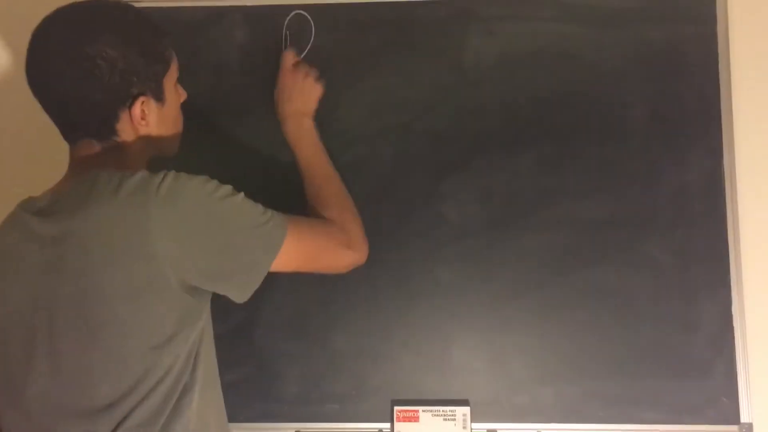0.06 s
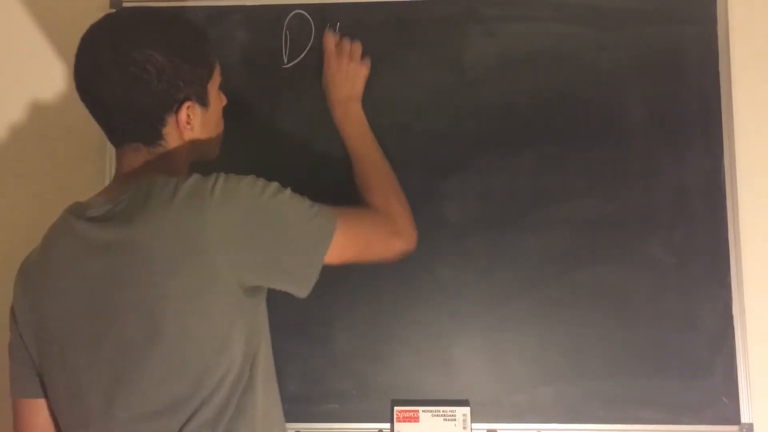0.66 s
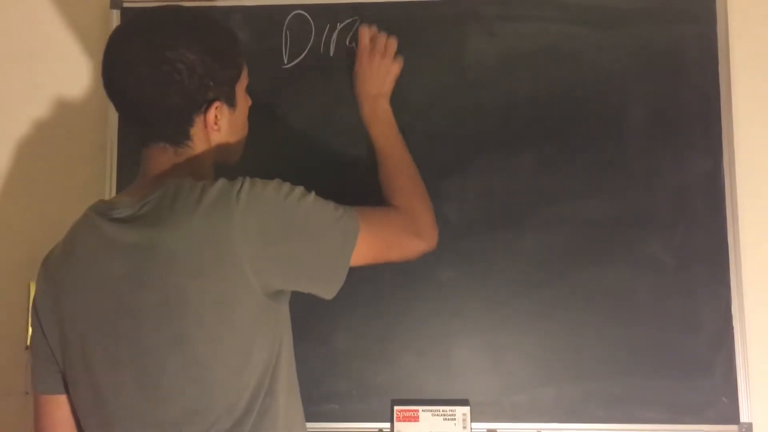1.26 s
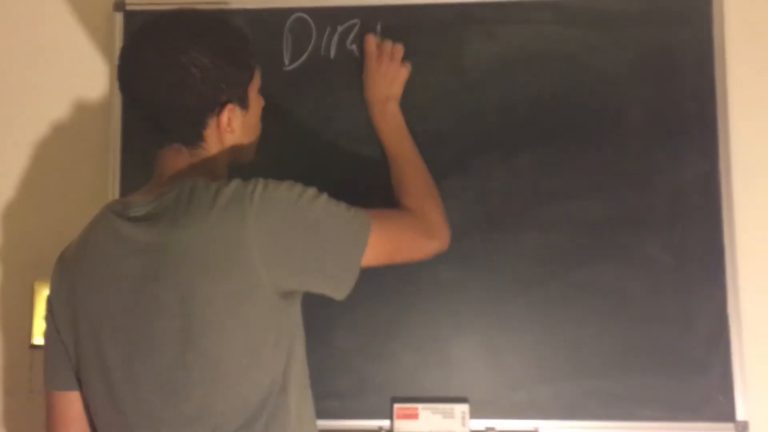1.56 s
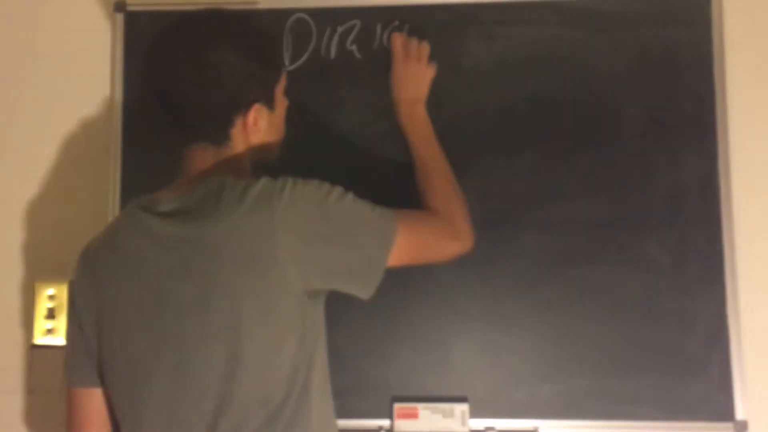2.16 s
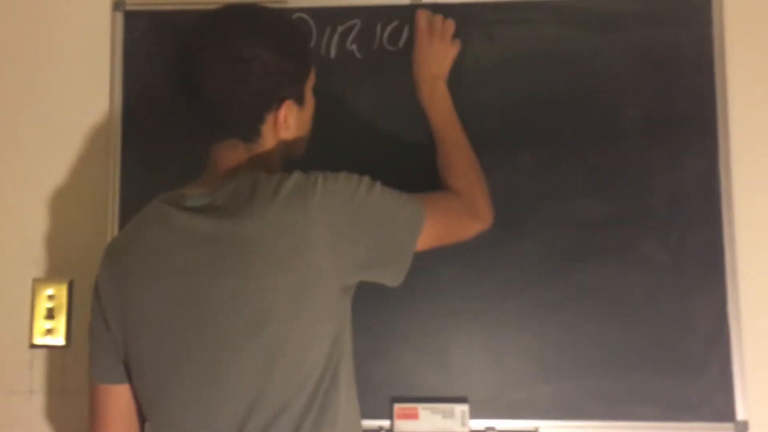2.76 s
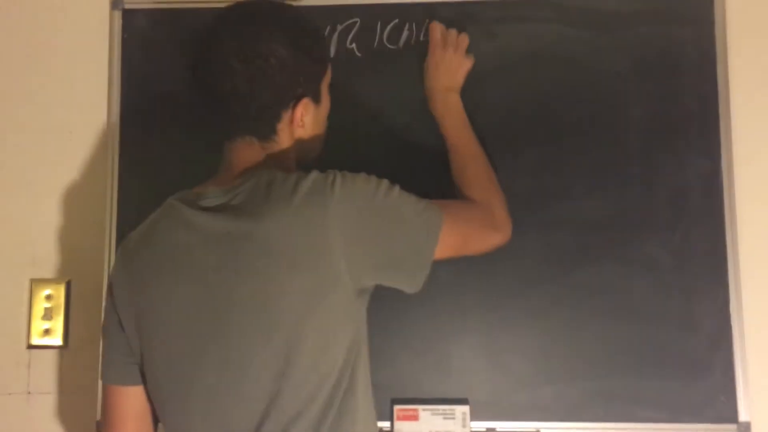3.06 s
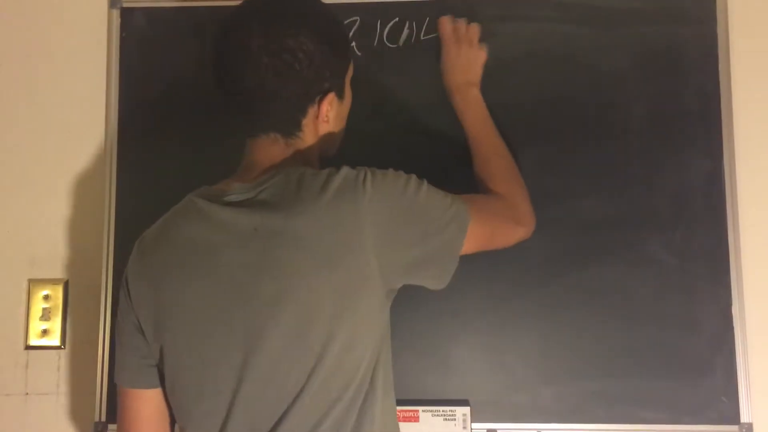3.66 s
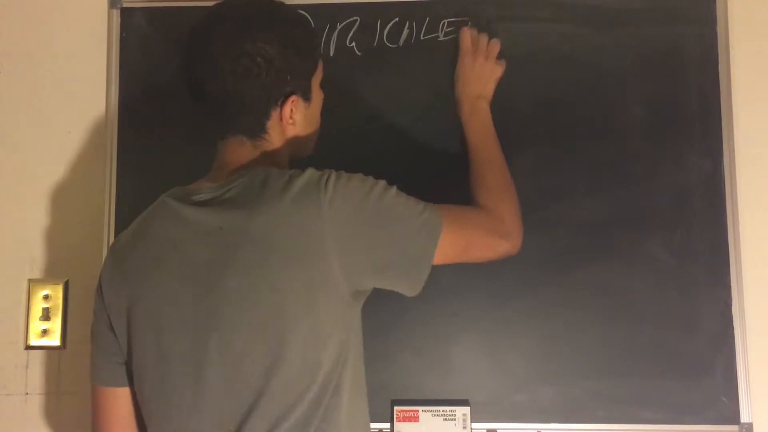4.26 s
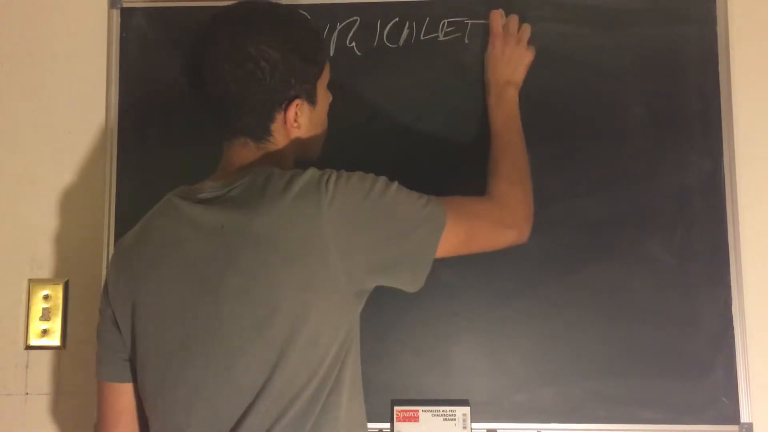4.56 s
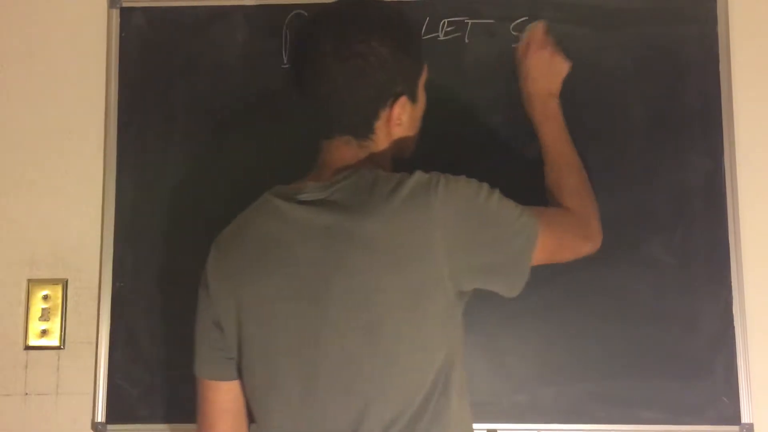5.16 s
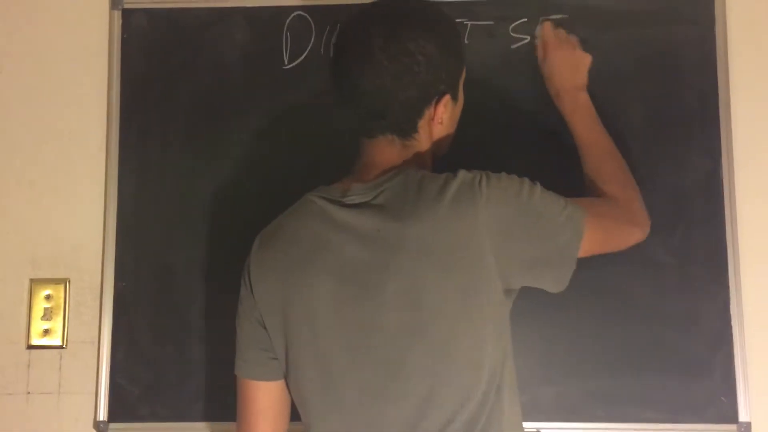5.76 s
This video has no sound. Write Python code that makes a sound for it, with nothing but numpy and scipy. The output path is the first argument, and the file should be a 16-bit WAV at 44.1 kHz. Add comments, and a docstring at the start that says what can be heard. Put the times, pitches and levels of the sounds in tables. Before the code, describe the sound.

Someone prints letters on a blackboard, with light chalk knocks, dry scratchy strokes and a few dull thumps from the loose board.

```python
"""Chalk scrapes softly on a wall-hung blackboard, over faint hum and hiss in a small, bare room.
Someone is printing capitals: the tip drags in tiny slips and sometimes catches in a brief rasp.
Many strokes land with a tap whose bending waves cross the panel, treble first and bass last.
A few taps bump the loose panel against the wall or set its metal frame ringing."""
import sys
import numpy as np
from scipy import signal
from scipy.fft import rfft, irfft, next_fast_len
from scipy.io import wavfile
from scipy.ndimage import map_coordinates

SR = 44100
rng = np.random.default_rng(int(sys.argv[2]) if len(sys.argv) > 2 else 0)


def unload_audio(sound):
    """Save the sound as a 16-bit wav file, at the path given as the first command line argument."""
    columns = np.transpose(np.atleast_2d(sound))
    # keep every value between -1 and 1, then stretch to whole-number steps
    steps = np.round(np.clip(columns, -1, 1) * 32767)
    wavfile.write(sys.argv[1], SR, steps.astype(np.int16))


N = 265041


def amp(db):
    """Decibels to gain."""
    return 10 ** (np.asarray(db) / 20)


def unit_rms(x):
    """Scale to rms 1."""
    return x / np.sqrt(np.mean(x ** 2) + 1e-20)


def curve_at(points, hz):
    """Interpolate (Hz, value) points on a log axis."""
    point_hz, values = np.transpose(points)
    return np.interp(np.log(hz + 1), np.log(point_hz), values)


def add(track, start_s, sound):
    """Mix a sound into the track."""
    start = round(start_s * SR)
    part = sound[max(-start, 0):max(N - start, 0)]
    track[max(start, 0):][:len(part)] += part


def wobble(rate_hz, size):
    """Smooth random curve, rate_hz knots a second."""
    return map_coordinates(rng.standard_normal(4096), [np.arange(size) * rate_hz / SR], mode="mirror")


def second_axes():
    """Time and frequency axes of one second."""
    return np.arange(SR) / SR, np.fft.rfftfreq(SR, 1 / SR)


def waveform(spectrum):
    """Spectrum to one second of sound, faded out at the end."""
    return irfft(spectrum) * np.clip(4 - 5 * second_axes()[0], 0, 1)


def minimum_phase(gain_db):
    """Causal response with this gain."""
    cepstrum = irfft(np.log(amp(gain_db)))
    cepstrum[1:SR // 2] *= 2
    cepstrum[SR // 2 + 1:] = 0
    return np.exp(rfft(cepstrum))


def peaks_db(rows, hz):
    """Summed gain of (Hz, width Hz, dB) resonances."""
    return sum(db / (1 + (2 * (hz - centre) / width) ** 2) for centre, width, db in rows)


def response_db(bands, controls_db, hz):
    """Each band follows each control with its own slope."""
    return curve_at([(centre, db + np.dot(slopes, controls_db)) for centre, db, *slopes in bands], hz)


def noise_band(centre_hz, width_hz):
    """One second of noise through a resonance, rms 1."""
    hz = second_axes()[1]
    return unit_rms(irfft(rfft(rng.standard_normal(SR)) / (1 + (2 * (hz - centre_hz) / width_hz) ** 2)))


def burst(t60_s):
    """Spectrum of a dying noise burst, energy 1."""
    noise = rng.standard_normal(SR) * amp(-60 * second_axes()[0] / t60_s)
    return rfft(noise / np.linalg.norm(noise))


# Room decay. Each row: frequency in Hz, t60 in seconds.
ROOM_DECAY = [(60, 0.88), (160, 0.57), (420, 0.28), (1100, 0.29), (3000, 0.31), (8000, 0.25), (16000, 0.14)]
def room_tail(build_up_s):
    """Spectrum of a diffuse tail; each frequency dies at its own rate."""
    hz, t, noise = signal.stft(rng.standard_normal(SR), SR, nperseg=256)
    decay = amp(-60 * t / curve_at(ROOM_DECAY, hz)[:, None])
    tail = signal.istft(noise * decay, SR, nperseg=256)[1][:SR]
    tail *= 1 - np.exp(-second_axes()[0] / build_up_s)
    return rfft(tail / np.linalg.norm(tail))


def slips(speed, grain_db=4.0, judder_db=3.5):
    """Spectrum of countless tiny, uneven slips of the tip."""
    noise = rng.standard_normal(SR)
    roughness = amp(grain_db * wobble(2500, SR) + judder_db * wobble(88.6, SR))
    return rfft(unit_rms(noise * roughness) * speed)


# Strokes without a tap. Each row: start in seconds, length in seconds, speed in dB, pressure in dB.
STROKES = [(-0.045, 0.28, 2.5, -2.5), (0.848, 0.16, 2.5, -5), (0.998, 0.1, 1.5, -4.5),
           (1.133, 0.041, -2.5, -0.5), (1.212, 0.11, -4, 1), (1.841, 0.12, -1.5, -3),
           (1.962, 0.073, -2.5, 0.5), (2.334, 0.15, -3.5, -3.5), (3.06, 0.1, -3.5, -3),
           (3.471, 0.093, 0.5, -5), (3.578, 0.094, 3, -2.5), (4.391, 0.087, -7.5, -13),
           (4.912, 0.093, 0, -3.5), (5.014, 0.065, 0, 0), (5.103, 0.081, 0.5, 0), (5.498, 0.12, -1, -5.5),
           (5.63, 0.084, 3.5, 1.5)]
# Drag spectrum. Each row: frequency in Hz, gain in dB.
DRAG_COLOUR = [(40, -20), (180, -4.5), (450, -2.5), (650, 8.5), (900, 8.5), (1400, 8), (2100, 1),
               (2900, 2.5), (4500, 1), (7600, 0.5), (9000, 2.5), (10200, -3.5), (12500, -1), (16000, -8.5)]
# Speed brings out hiss, pressure the panel's drone.
# Each row: frequency in Hz, gain in dB, dB per dB of speed, dB per dB of pressure.
DRAG_RESPONSE = [(1200, -54.5, 0.23, 1), (3450, -55, 0.96, 0.23), (8800, -63, 1.16, -0.05)]
# Panel resonances, also heard in taps. Each row: centre in Hz, width in Hz, gain in dB.
PANEL_PEAKS = [(240, 26, 3), (378.6, 26, 4), (448, 22, -9), (531, 44, 3), (671, 57, 4.5), (743, 27, -1.5),
               (837, 20, 2), (967, 24, 2.5), (1034, 16, 3), (1094, 24, 0.5), (1242, 50, 2), (1385, 54, 4),
               (1548, 90, 3), (1990, 98, 1.5)]
# Chalk stick resonances. Each row: centre in Hz, width in Hz, gain in dB.
STICK_PEAKS = [(3060, 260, 0.5), (3484, 115, 4), (4390, 130, 4), (8860, 300, 5)]
def drags(swell_power=0.32, settle_s=0.008):
    """Chalk crumbles along each stroke, loudest where the hand moves fastest."""
    t, hz = second_axes()
    out = np.zeros(N)
    resonance_db = peaks_db(PANEL_PEAKS + STICK_PEAKS, hz)
    # After each tap the tip settles, then is pulled down the board.
    downstrokes = [(tap_s + settle_s, length_s, speed_db, 0) for tap_s, *_, length_s, speed_db in TAPS]
    for start_s, length_s, speed_db, pressure_db in downstrokes + STROKES:
        speed = np.abs(np.sin(np.pi * np.clip(t / length_s, 0, 1))) ** swell_power
        drive_db = response_db(DRAG_RESPONSE, [speed_db, pressure_db], hz)
        colour = minimum_phase(curve_at(DRAG_COLOUR, hz) + drive_db + resonance_db)
        direct = amp(-5) * slips(speed)
        panel = amp(-8.5) * slips(speed) * burst(t60_s=0.052)
        room = amp(-0.5) * slips(speed) * room_tail(build_up_s=0.0013)
        add(out, start_s, waveform((direct + panel + room) * colour))
    return out


# Room noise spectrum. Each row: frequency in Hz, relative density in dB.
AIR_COLOUR = [(20, -17), (50, 2), (130, -10), (400, -22.5), (700, -18.5), (1400, -18.5), (2500, -27),
              (5000, -29.5), (10000, -34.5), (16000, -35.5)]
# Hum. Each row: frequency in Hz, rms level in dB.
HUM_TONES = [(59.5, -78)]
def background(air_db=-68):
    """Soft room noise with a low, wavering hum."""
    t, hz = np.arange(N) / SR, np.fft.rfftfreq(N, 1 / SR)
    air = irfft(rfft(rng.standard_normal(N)) * amp(curve_at(AIR_COLOUR, hz)), N)
    out = amp(air_db) * unit_rms(air)
    for hum_hz, level_db in HUM_TONES:
        peak = np.sqrt(2) * amp(level_db + 1.1 * wobble(3.0, N))
        out += peak * np.sin(2 * np.pi * hum_hz * t + 1.4 * wobble(22, N))
    return out


# Stick catches. Each row: midpoint in seconds, length in seconds, centre in Hz, width in Hz, level in dB.
CATCHES = [(0.124, 0.23, 670, 160, -59.5), (1.278, 0.093, 990, 400, -58), (3.629, 0.04, 3860, 900, -54.5),
           (4.095, 0.084, 3900, 500, -62), (5.67, 0.069, 3400, 400, -65)]
def catches():
    """Slips briefly lock onto one resonance of stick and panel: a half-pitched rasp."""
    t = second_axes()[0]
    out = np.zeros(N)
    for middle_s, length_s, centre_hz, width_hz, level_db in CATCHES:
        rasp = noise_band(centre_hz, width_hz) * np.sin(np.pi * np.clip(t / length_s, 0, 1))
        direct_and_room = amp(-1.5) + amp(-5) * room_tail(build_up_s=0.0013)
        add(out, middle_s - length_s / 2, amp(level_db) * waveform(rfft(rasp) * direct_and_room))
    return out


def bending_wave(travel_s, hz):
    """Speed grows with the root of frequency, so a click becomes a falling chirp."""
    return np.exp(-4j * np.pi * travel_s * np.sqrt(300 * hz))


# Echo paths via the panel's edges. Each row: travel time at 300 Hz in seconds, gain in dB.
EDGE_PATHS = [(.0075, -2.5), (.019, -3), (.034, -10), (.050, -4), (.071, -10.5)]
def edge_echoes(hz, loss_db_per_s_hz=0.36):
    """Spectrum of edge reflections; each struck spot has its own distances."""
    return sum(amp(db - loss_db_per_s_hz * travel_s * hz)
               * bending_wave(travel_s * rng.normal(1, 0.026), hz) for travel_s, db in EDGE_PATHS)


def impact(hz, chatter_cut_hz=1200, direct_cut_hz=700, diffuse_cut_hz=200):
    """Spectrum of one blow: the tip chatters, the spot radiates, echoes blur into a tail."""
    echoes = edge_echoes(hz)
    direct = amp(-3) * bending_wave(0.001492, hz) * hz / (hz + direct_cut_hz)
    chatter = amp(0.5) * burst(t60_s=0.034) * hz / (hz + chatter_cut_hz)
    panel = amp(-5) * burst(t60_s=0.059) / (1 + hz / 3000)
    room = amp(-1.5) * room_tail(build_up_s=0.0014) / (1 + hz / 14000)
    diffuse = (panel + room) * bending_wave(0.007, hz) * hz / (hz + diffuse_cut_hz)
    return chatter + (direct + echoes) / (1 + hz / 6000) + diffuse


def ringing(modes, rise_s):
    """Damped (Hz, dB, t60 s) modes at slightly random strengths, faded out by one second."""
    t = second_axes()[0]
    tones = np.zeros(SR)
    for hz, level_db, t60_s in modes:
        envelope = amp(level_db + rng.normal(0, 1.64) - 60 * t / t60_s)
        tones += envelope * np.sin(2 * np.pi * hz * t + rng.uniform(0, 2 * np.pi))
    return tones * (1 - np.exp(-t / rise_s)) * (1 - t ** 2)


# Chalk landings. Each row: start in seconds, force in dB, hollowness in dB, snap pitch in Hz,
# snap boost in dB, downstroke length in seconds, downstroke speed in dB.
TAPS = [(0.3933, -1.5, 0.7, 4020, 12, 0.12, 0.5), (0.6807, -3, 3, 4600, 4, 0.13, 2),
        (1.5183, -1, -3.5, 3600, 12.5, 0.115, -2.5), (1.7903, -3.5, 1.7, 1370, 3.5, 0.13, -10),
        (2.1848, -1, -3.5, 3750, 9, 0.117, 1), (2.6034, 2.5, 0.9, 1730, 4, 0.12, -3.5),
        (2.8916, -1, 0.5, 5040, 7, 0.12, 0.5), (3.3172, 1.5, 0, 2180, 4, 0.12, -0.5),
        (3.8045, 1, -2, 2050, 4.5, 0.07, 0.5), (4.005, 6.5, -4, 4270, 5.5, 0.095, 4),
        (4.2063, 4.5, -1.3, 3020, 3.5, 0.15, 0), (4.4691, 3.5, 1.5, 3800, 2.5, 0.14, 3),
        (4.8703, -12, -1.2, 2820, 5, 0.05, -11), (5.356, -0.5, -0.5, 3140, 6, 0.12, -2.5),
        (5.8635, 1.5, -2.5, 3110, 6, 0.076, 2)]
# Average tap spectrum. Each row: frequency in Hz, gain in dB.
TAP_COLOUR = [(25, -1), (55, 3.5), (110, 8), (170, 14), (330, 13), (600, 9.5), (1300, 8), (2100, -2.5),
              (3300, -6.5), (5000, -14.5), (7500, -22), (9000, -24), (11000, -33), (16000, -37)]
# A firm blow rings and ticks, a hollow spot thuds.
# Each row: frequency in Hz, gain in dB, dB per dB of force, dB per dB of hollowness.
TAP_RESPONSE = [(203, -2.5, 0.24, 0.75), (620, -1.5, 1.1, 0.22), (1250, -3, 0.98, -0.85),
                (3270, -2, 0.85, 0.45), (10000, -2.5, 1.5, 0.76)]
# Low modes of panel and room. Each row: frequency in Hz, relative level in dB, t60 in seconds.
THUD_MODES = [(59.65, -8, 0.79), (96.8, -10.5, 0.76), (154.9, -7, 0.55), (176.8, -4.5, 0.33),
              (243.7, -9, .38)]
def taps(spot_hz=(595, 1004), spot_width_hz=130, spot_db=3.5, spot_rise_per_s=0.024,
         snap_width_hz=800, thud_db=-36.5):
    """The tip strikes the panel: a knock, the stick's snap and a low thud."""
    hz = second_axes()[1]
    out = np.zeros(N)
    for start_s, force_db, hollow_db, snap_hz, snap_db, *_ in TAPS:
        strength_db = response_db(TAP_RESPONSE, [force_db, hollow_db], hz)
        # The spot's resonances rise as the hand moves along the line; grip and angle tune the snap.
        spot = [(centre * (1 + spot_rise_per_s * start_s), spot_width_hz, spot_db) for centre in spot_hz]
        snap = [(snap_hz, snap_width_hz, snap_db)]
        resonance_db = peaks_db(PANEL_PEAKS + spot + snap, hz)
        colour = minimum_phase(curve_at(TAP_COLOUR, hz) + strength_db + resonance_db)
        blow = waveform(colour * impact(hz))
        thud = amp(thud_db + strength_db[0]) * ringing(THUD_MODES, rise_s=0.024)
        add(out, start_s, blow + thud)
    return out


# Panel hits the wall. Each row: time in seconds, push peak in dB, boom level in dB.
WALL_BUMPS = [(0.422, -30, -43), (0.709, -29.5, -36), (1.548, -36, -43), (1.82, -29, -32.5)]
def wall_bumps(push_hz=165, width_s=0.0067, boom_hz=160.6, boom_t60_s=0.32):
    """Tapped near a corner, the loose panel meets the wall: a dull push of air, then a short boom."""
    out, t = np.zeros(N), np.arange(N) / SR
    for time_s, push_db, boom_db in WALL_BUMPS:
        envelope = amp(push_db) * np.exp(-((t - time_s) / width_s) ** 2)
        out += envelope * np.cos(2 * np.pi * push_hz * (t - time_s))
        add(out, time_s, amp(boom_db) * ringing([(boom_hz, 0, boom_t60_s)], rise_s=0.011))
    return out


# Metal frame rings. Each row: start in seconds, centre in Hz, level in dB, t60 in seconds before the fade.
FRAME_RINGS = [(2.601, 1470, -56, 0.86), (4.469, 1420, -66.5, 6.6)]
def frame_rings(width_hz=110):
    """Close modes of the frame's rails blur into one faint band, faded out by one second."""
    t = second_axes()[0]
    out = np.zeros(N)
    for start_s, centre_hz, level_db, t60_s in FRAME_RINGS:
        envelope = amp(level_db - 60 * t / t60_s) * (1 - t ** 2)
        add(out, start_s, noise_band(centre_hz, width_hz) * envelope)
    return out


def scene():
    """Writing on the board, heard in mono from a few steps behind."""
    return (drags() + background() + catches() + taps() + wall_bumps() + frame_rings())[None]


def record(dry, low_cut_hz=30, top_hz=16200):
    """The microphone sheds the deepest bass and everything above its band limit."""
    low_cut = signal.butter(3, low_cut_hz, "highpass", fs=SR, output="sos")
    size = next_fast_len(N + SR)
    spectrum = rfft(signal.sosfilt(low_cut, dry), size)
    in_band = np.fft.rfftfreq(size, 1 / SR) < top_hz
    return irfft(spectrum * in_band, size)[:, :N]


dry = scene()
out = record(dry)
unload_audio(out)
```